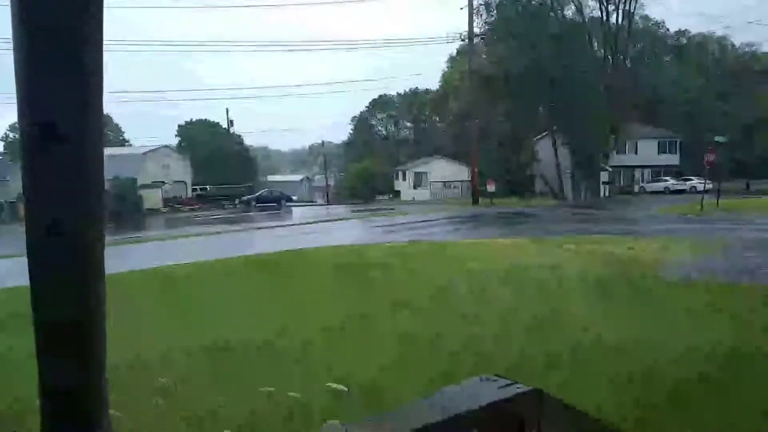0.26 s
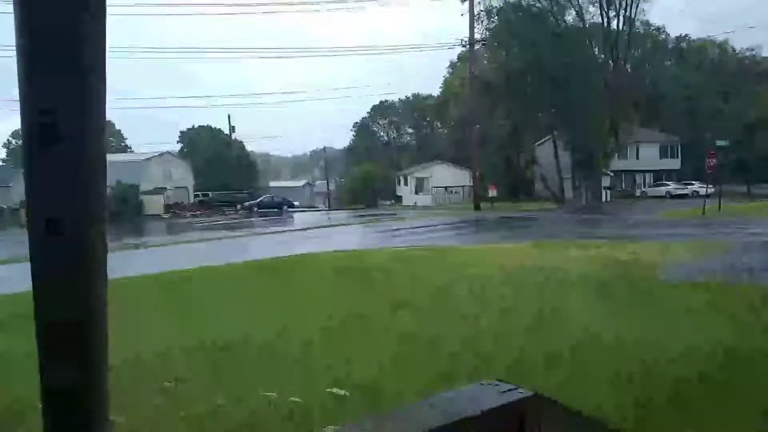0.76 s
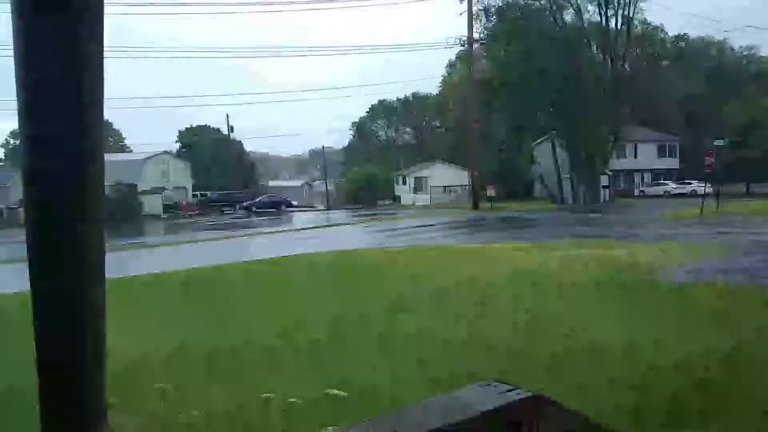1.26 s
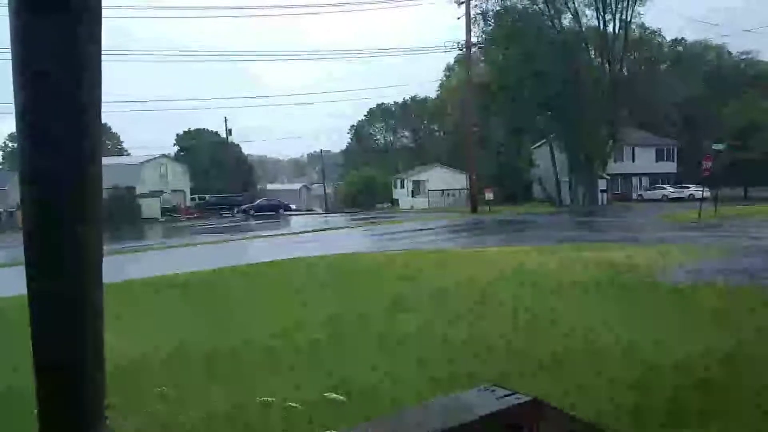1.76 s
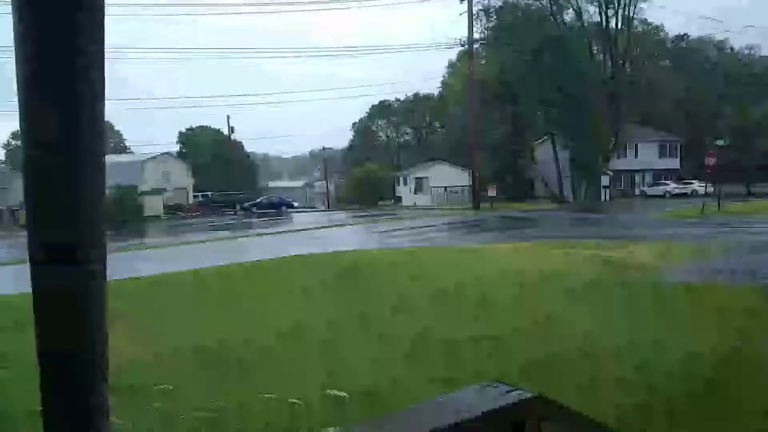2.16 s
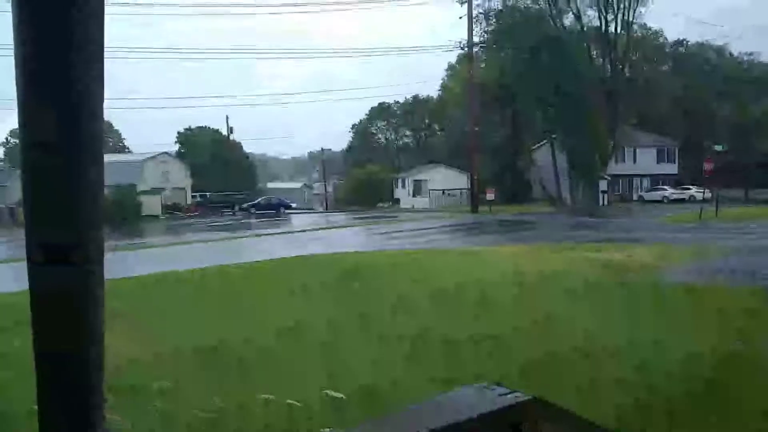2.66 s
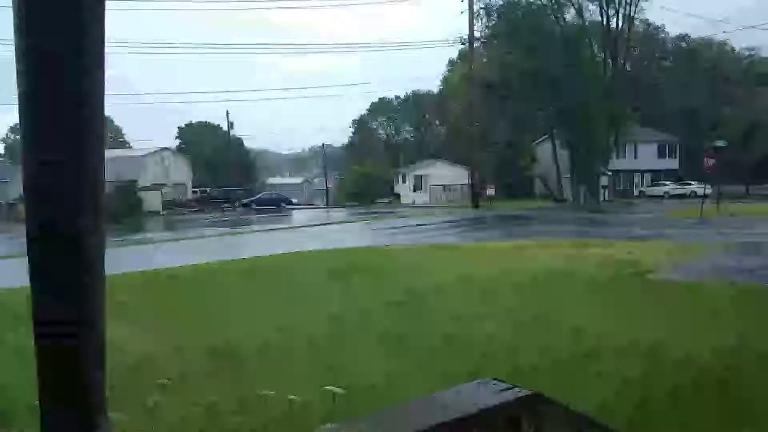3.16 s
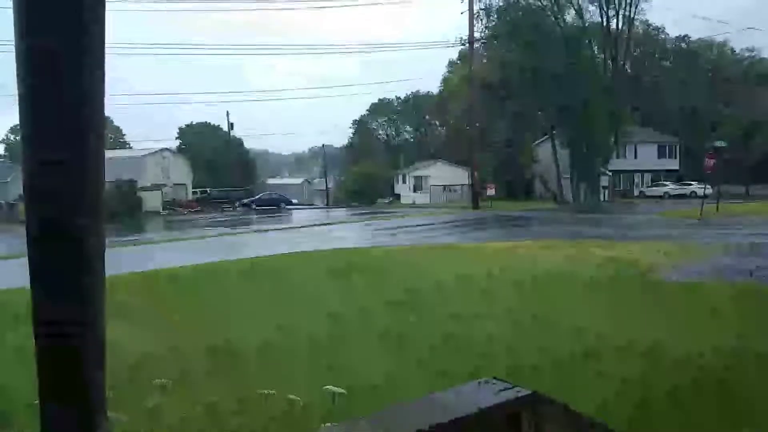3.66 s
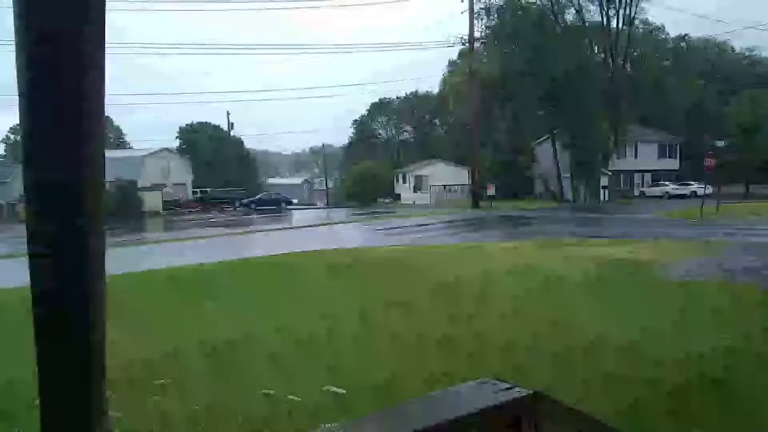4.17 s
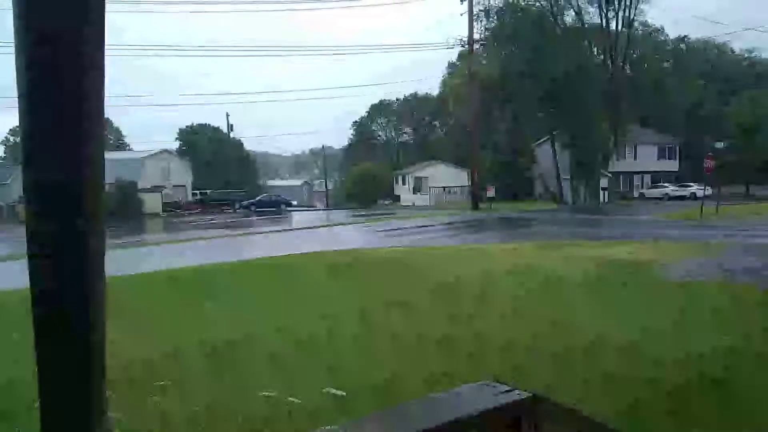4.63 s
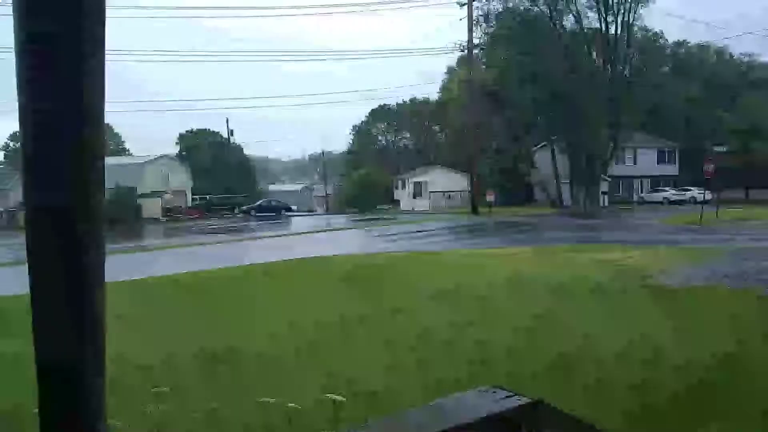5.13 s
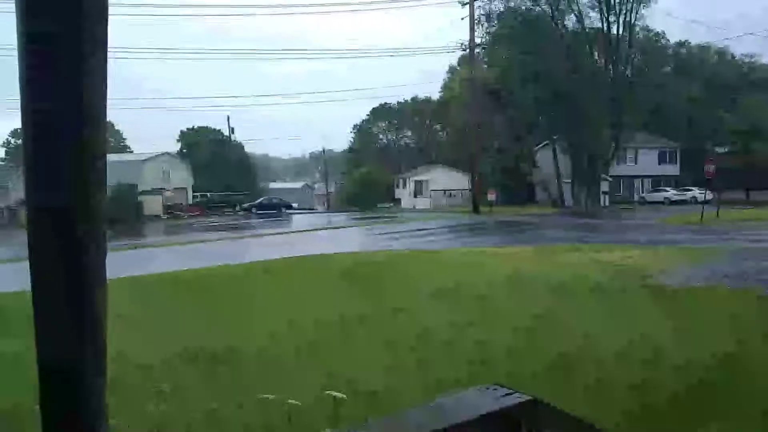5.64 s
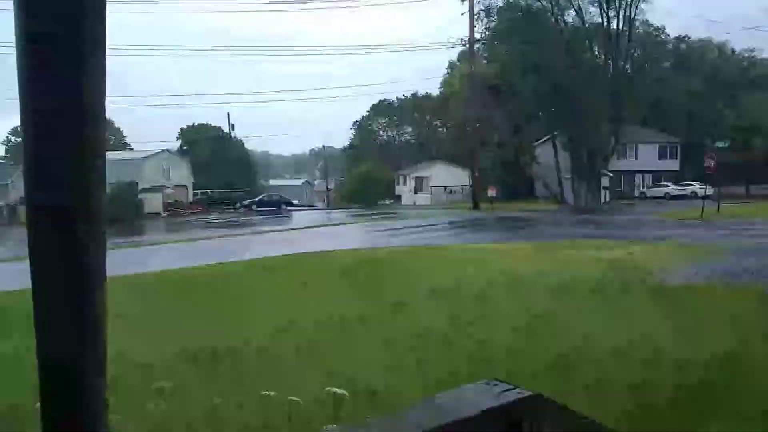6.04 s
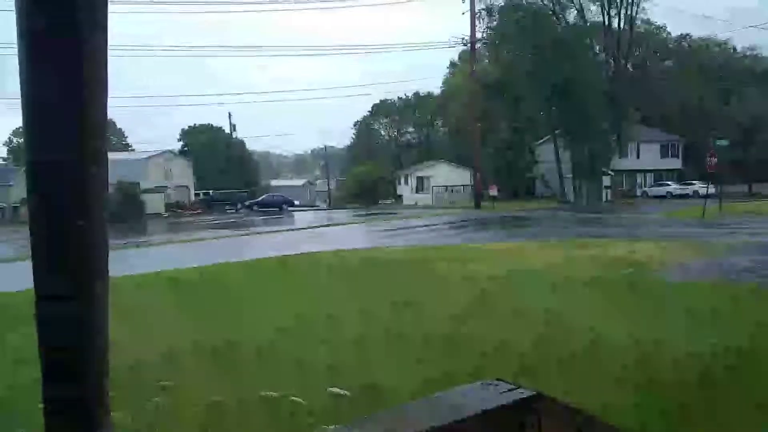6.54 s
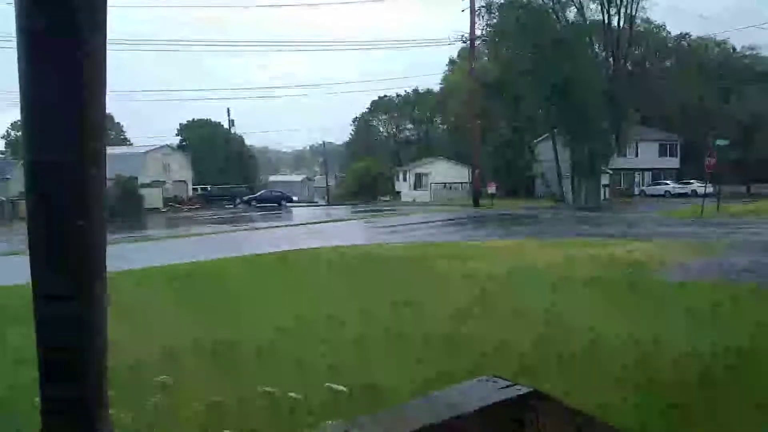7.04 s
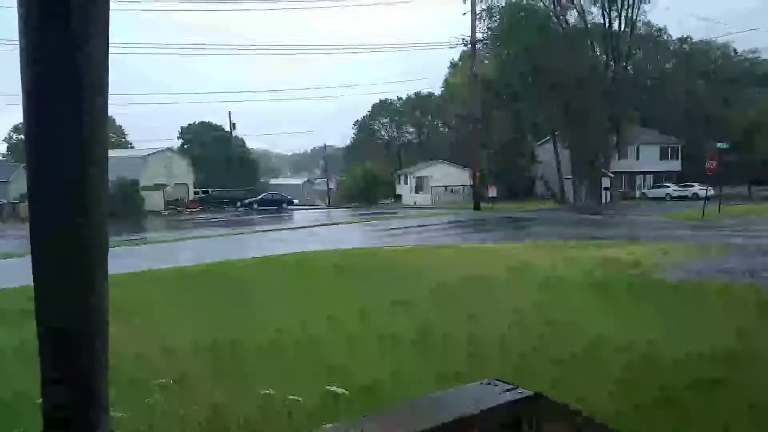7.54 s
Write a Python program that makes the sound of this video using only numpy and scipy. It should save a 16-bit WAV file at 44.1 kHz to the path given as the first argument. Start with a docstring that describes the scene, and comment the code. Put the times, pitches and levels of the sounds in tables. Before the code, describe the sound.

Wide continuous rain hiss with patchy, grainy treble and a low rumble beneath, outdoors near houses and trees. Small birds give faint low chirps first, then high thin whistles sliding down into quick twitters, returning several times. Isolated heavy drips burst softly near the porch, mostly in the first six seconds. A weak electrical hum wavers underneath; the top treble is dulled.

```python
"""Rain on a lawn, with birds

Steady heavy rain heard from a porch: noise and single ticks form a wide hiss over a low rumble.
Mains equipment hums as wavering sines; three birds sing in gliding sines with a scattered tail.
A few big drips splat nearby as short noise bursts in three bands.
Two microphone ports pick it up; each channel subtracts a delayed copy of the other port to widen the image."""
import sys
import numpy as np
from scipy import signal
from scipy.fft import rfft, irfft
from scipy.io import wavfile
from scipy.ndimage import uniform_filter1d

SR = 44100
rng = np.random.default_rng(int(sys.argv[2]) if len(sys.argv) > 2 else 0)


def waveform_to_disk(signal):
    """Save audio, clipped to [-1, 1], as 16-bit WAV at the path in sys.argv[1]."""
    frames = np.transpose(np.atleast_2d(signal))
    scaled = np.clip(frames, -1, 1) * 32767
    samples = np.round(scaled).astype(np.int16)
    wavfile.write(sys.argv[1], SR, samples)


N = 343980
HZ = np.maximum(np.fft.rfftfreq(N, 1 / SR), 1)  # FFT bins, kept above 0 for the log axis


def from_db(db):
    """Gain of a level in dB."""
    return 10 ** (np.asarray(db) / 20)


def by_hz(rows):
    """Each column of a table read at every FFT bin, on a log-frequency axis."""
    hz, *columns = np.transpose(rows)
    return [np.interp(np.log(HZ), np.log(hz), column) for column in columns]


def drift(points_per_s):
    """Slow chance of spread 1: random points joined by straight lines."""
    return np.interp(np.arange(N) * points_per_s / SR, np.arange(3000), rng.standard_normal(3000))


def band(x, low_hz, high_hz):
    """Causal band-pass."""
    return signal.sosfilt(signal.butter(2, [low_hz, high_hz], "band", fs=SR, output="sos"), x)


def at_ports(x, pan_db, lag_s):
    """A source off to one side reaches the right port lag_s later (earlier if negative), at another level."""
    right = irfft(rfft(x) * np.exp(-2j * np.pi * HZ * lag_s), N)
    return np.array([x * from_db(pan_db / 2), right * from_db(-pan_db / 2)])


# course of the shower: (time [s], rumble gain [dB], hiss gain [dB])
SHOWER_COURSE = [(0.0, -2, -0.5), (7.8, -2, -2.5)]
# rain spectrum before the shower gains: (frequency [Hz], density [dB per Hz])
RAIN_SPECTRUM = [(25, -74), (45, -76.5), (70, -70.5), (150, -74), (280, -75), (480, -81), (650, -86),
                 (2300, -88), (3000, -86), (3700, -89), (4500, -85.5), (5200, -86.5), (6500, -87),
                 (8000, -90.5), (10500, -100), (14000, -105)]
# the two ports: (frequency [Hz], likeness [-1 to 1], phase of right port [rad], left minus right [dB])
PORT_LIKENESS = [(28, .99, .07, -.4), (65, .96, -.03, -1.1), (100, .94, .03, -1.8), (150, .94, 0, -1.2),
                 (220, .88, -.22, -2.5), (370, .77, -.14, -.9), (480, .68, .05, -1.2),
                 (620, .34, .15, -1.2), (900, .1, 0, -1.8), (1500, -.18, 0, -1.5), (2400, -.1, 0, -.3),
                 (3000, -.2, 0, -3), (3600, 0, 0, -1), (4500, 0, 0, 1.2), (6500, 0, 0, 1.5),
                 (8000, 0, 0, -1), (10500, 0, 0, -3), (14000, 0, 0, -5.5)]
DROPS_PER_S, DROP_POWER_SHARE = 2500, 0.26


def rain(patchy_db, size_db):
    """Far drops merge to noise, nearer ones stay single ticks; gusts make the treble come in patches."""
    sizes = from_db(size_db * np.minimum(rng.exponential(1, (2, N)), 5))
    signed_sizes = sizes * rng.choice([-1, 1], (2, N))
    drops = signed_sizes * (rng.random((2, N)) < DROPS_PER_S / SR)
    far = rng.standard_normal((2, N))
    ticks = drops / drops.std()
    near = rfft(np.sqrt(1 - DROP_POWER_SHARE) * far + np.sqrt(DROP_POWER_SHARE) * ticks)

    time_s, rumble_db, hiss_db = np.transpose(SHOWER_COURSE)
    t, gust = np.arange(N) / SR, drift(14)
    white = irfft(rfft(far) * (HZ < 1000), N) * from_db(np.interp(t, time_s, rumble_db))
    for low_hz in 1000 * 2 ** np.arange(0, 4, .5):  # half-octave bands
        patch_db = np.interp(t, time_s, hiss_db) + patchy_db * (0.59 * gust + drift(20))
        in_band = (HZ >= low_hz) * (HZ < low_hz * np.sqrt(2))
        white += irfft(near * in_band, N) * from_db(patch_db)

    # long waves reach both ports nearly alike, short ones are mostly unrelated
    likeness, phase_rad, balance_db = by_hz(PORT_LIKENESS)
    density_db, = by_hz(RAIN_SPECTRUM)
    left, other = rfft(white) * from_db(density_db) * np.sqrt(SR / 2)
    right = likeness * left * np.exp(1j * phase_rad) + np.sqrt(1 - likeness ** 2) * other
    return irfft([left * from_db(balance_db / 2), right * from_db(-balance_db / 2)], N)


# hum lines before their drift: (frequency [Hz], level [dB])
HUM_LINES = [(120, -63), (179.5, -60), (240, -60), (480, -70), (720, -76)]
# extra gain of the third harmonic: (time [s], gain [dB])
THIRD_HARMONIC_SWELL = [(0, -8), (2.4, -20), (2.7, 1), (4.0, -5), (4.22, 14.5), (4.45, -1), (4.7, 6.5),
                        (6.8, 4.5), (7.8, -8)]


def hum():
    """Mains harmonics: sines whose levels waver; the third one also swells."""
    t = np.arange(N) / SR
    lines = []
    for hz, level_db in HUM_LINES:
        waver = from_db(level_db + 3.0 * drift(8))
        lines.append(waver * np.sin(2 * np.pi * (hz * t + rng.random())))
    lines[1] *= from_db(np.interp(t, *np.transpose(THIRD_HARMONIC_SWELL)))
    return sum(lines)


def bird(notes, flutter_db, rasp_hz):
    """Each note is a gliding sine with soft ends; held notes are purer, fast glides turn raspy."""
    out, tremble_hz = np.zeros(N), rasp_hz * drift(330)
    for note in notes:
        time_s, hz, level_db = np.transpose(note)
        at = np.arange(round(time_s[0] * SR), round(time_s[-1] * SR))
        t = at / SR
        ends = np.clip(np.minimum(t - time_s[0], time_s[-1] - t) / .004, 0, 1)
        pitch_hz = np.interp(t, time_s, hz)
        glide = np.clip(abs(np.gradient(pitch_hz)) * SR / 15000, .25, 1)  # 1 = 15 kHz/s or faster
        phase = 2 * np.pi * np.cumsum(pitch_hz + glide * tremble_hz[at]) / SR
        flutter = from_db(flutter_db * (.5 + glide) * drift(140)[at])
        level = np.sqrt(2) * from_db(np.interp(t, time_s, level_db))
        out[at] += ends * flutter * level * np.sin(phase)
    return out


EDGE_DB = 1  # drop at both ends of a chirp
THIN_HZ, THIN_DB_PER_KHZ = 6350, 14  # chirps weaken above this pitch


def chirps(rows):
    """The pitch of a chirp is a parabola through its start, middle and end."""
    u, notes = np.linspace(-1, 1, 9), []
    for start_s, length_s, start_hz, middle_hz, end_hz, level_db in rows:
        slope_hz = (end_hz - start_hz) / 2
        bend_hz = (start_hz + end_hz) / 2 - middle_hz
        hz = middle_hz + slope_hz * u + bend_hz * u ** 2
        thin_db = THIN_DB_PER_KHZ * np.maximum(hz - THIN_HZ, 0) / 1000
        time_s = start_s + length_s * (u + 1) / 2
        notes.append(np.transpose([time_s, hz, level_db - EDGE_DB * u ** 2 - thin_db]))
    return notes


# (time [s], length [s], start pitch [Hz], middle pitch [Hz], end pitch [Hz], level before flutter [dB])
DEEP_BIRD_CHIRPS = [(.295, .014, 2750, 2820, 2900, -57), (.372, .011, 2930, 2810, 2700, -55),
                    (.565, .05, 2550, 2510, 2480, -60), (.612, .016, 3200, 3150, 3100, -57),
                    (.718, .014, 2600, 2620, 2640, -57), (2.207, .051, 2900, 2855, 2820, -49),
                    (5.33, .02, 3000, 2900, 2800, -55)]


def deep_bird():
    """Curved chirps of the deepest bird, with the least flutter and rasp."""
    return bird(chirps(DEEP_BIRD_CHIRPS), flutter_db=1.5, rasp_hz=50)


# (time [s], length [s], start pitch [Hz], middle pitch [Hz], end pitch [Hz], level before flutter [dB])
LOW_BIRD_CHIRPS = [(.335, .055, 3300, 3350, 3050, -59), (.525, .025, 3400, 3300, 3200, -58),
                   (1.855, .025, 3660, 3850, 4200, -62), (2.205, .03, 3460, 3550, 3650, -61),
                   (2.89, .025, 4000, 3950, 3900, -60), (4.186, .03, 3690, 3660, 3720, -57),
                   (4.329, .018, 3450, 3950, 5100, -56), (4.36, .016, 3850, 3820, 3600, -46),
                   (4.373, .021, 3550, 3480, 3900, -49), (4.398, .011, 3600, 3400, 3500, -49.5),
                   (4.407, .015, 3750, 3780, 3950, -53)]


def low_bird():
    """Curved chirps of the low bird, mostly pitched between the other two."""
    return bird(chirps(LOW_BIRD_CHIRPS), flutter_db=2.2, rasp_hz=60)


def echoes(x, wet_db, t60_s):
    """Trees and house walls scatter the song into a short tail, another one at each port."""
    t = np.arange(SR // 2) / SR
    tails = rng.standard_normal((2, len(t))) * from_db(-60 * t / t60_s) * (t > .006)
    tails /= np.sqrt(np.sum(tails ** 2, axis=1, keepdims=True))
    return from_db(wet_db) * signal.fftconvolve(x[None], tails, axes=1)[:, :N]


# big drips: (time [s], level before lift [dB], 1-2.6 kHz part before lift [dB],
# 6.5-10.5 kHz part before lift [dB], t60 [s], left minus right [dB])
DRIPS = [(0.667, -44, -11, -20, 0.067, 3), (2.146, -35.5, -19, -22, 0.16, 4),
         (2.61, -43, -5, -16, 0.056, 2), (3.022, -59, -10, -16, 0.1, -3), (3.439, -59, -9, 5, 0.1, 1),
         (3.4854, -44, -6, -11, 0.13, 1), (4.888, -49, 2.5, -17, 0.21, -11),
         (5.3383, -46, -16, -24, 0.22, 2), (5.6173, -43.5, -18, -18, 0.16, -1),
         (5.722, -46, -6, -11, 0.092, 2), (6.059, -55.5, 0, 2, 0.1, -4)]
DRIP_LIFT_DB, LOW_LIFT_DB, HIGH_LIFT_DB = 6.0, 2.0, 2.5


def splats():
    """A big drip bursts into spray: a noise burst in three bands that dies fast."""
    out, t = np.zeros((2, N)), np.arange(SR // 5) / SR
    for start_s, level_db, low_db, high_db, t60_s, pan_db in DRIPS:
        envelope = (1 - np.exp(-t / 0.00065)) * from_db(-60 * t / max(t60_s, .02))
        spray = rng.standard_normal((2, len(t))) * envelope
        # a narrow band holds less of the noise, so the parts are lifted
        burst = band(spray, 1840, 4840)
        burst += from_db(low_db + LOW_LIFT_DB) * band(spray, 920, 2630)
        burst += from_db(high_db + HIGH_LIFT_DB) * band(spray, 6500, 10500)
        at = round(start_s * SR)
        sides_db = pan_db * np.array([[.5], [-.5]])
        out[:, at:at + len(t)] += from_db(level_db + DRIP_LIFT_DB + sides_db) * burst
    return out


# held whistles: (time [s], length [s], pitch [Hz], scoop from below [Hz], end level before flutter [dB])
HELD_WHISTLES = [(1.692, .041, 6550, 0, -52), (3.99, .036, 6660, 0, -48), (5.064, .084, 6720, 150, -50),
                 (7.258, .085, 6700, 1000, -51)]
SCOOP_S, SWELL_DB = .014, 6
SECOND_VOICE_HZ, SECOND_VOICE_DB = 900, -11  # relative to the whistle


def whistles():
    """A whistle scoops up to its pitch and swells; a weaker second voice holds above it."""
    notes = []
    for start_s, length_s, hz, scoop_hz, level_db in HELD_WHISTLES:
        end_s, scooped_s = start_s + length_s, start_s + SCOOP_S
        notes.append([(start_s, hz - scoop_hz, level_db - SWELL_DB),
                      (scooped_s, hz, level_db - SWELL_DB / 2),
                      (end_s, hz, level_db)])
        second_hz, second_db = hz + SECOND_VOICE_HZ, level_db + SECOND_VOICE_DB
        notes.append([(start_s + SCOOP_S / 2, second_hz, second_db), (end_s, second_hz, second_db)])
    return notes


# slides: (time [s], length [s], landing pitch [Hz], level before fade and flutter [dB])
DOWN_SLIDES = [(1.729, .06, 5340, -54), (4.022, .046, 5420, -46.5), (4.073, .044, 5440, -49),
               (5.111, .012, 6160, -48), (7.338, .022, 6100, -50)]
TOP_HZ, SLIDE_S, FADE_DB_PER_S = 6650, .008, 150


def slides():
    """A slide drops fast from the top pitch, then holds and fades."""
    notes = []
    for start_s, length_s, hz, level_db in DOWN_SLIDES:
        end_db = level_db - FADE_DB_PER_S * length_s
        notes.append([(start_s, TOP_HZ, level_db),
                      (start_s + SLIDE_S, hz, level_db),
                      (start_s + length_s, hz, end_db)])
    return notes


# (time [s], length [s], start pitch [Hz], middle pitch [Hz], end pitch [Hz], level before flutter [dB])
HIGH_BIRD_CHIRPS = [(1.745, .014, 6050, 6050, 6100, -51), (1.875, .016, 6100, 6200, 6350, -54),
                    (1.925, .022, 5900, 6150, 6350, -55), (1.958, .024, 5500, 5000, 4840, -54),
                    (4.03, .02, 5800, 6250, 6350, -56), (4.046, .03, 5600, 6300, 6600, -49),
                    (4.094, .03, 5480, 6300, 6550, -50), (4.122, .026, 6100, 5200, 4950, -49),
                    (4.155, .03, 4950, 5150, 5750, -54), (4.135, .03, 6500, 5900, 5500, -57),
                    (4.16, .045, 6400, 5900, 5000, -55), (5.056, .01, 6050, 6250, 6500, -52),
                    (5.252, .04, 5650, 6650, 6100, -47.5), (5.285, .06, 5950, 5600, 6000, -55),
                    (5.285, .045, 5300, 5100, 4800, -57), (5.316, .022, 6000, 6600, 6050, -46.5),
                    (7.343, .022, 5600, 5300, 5250, -54), (7.36, .04, 5950, 6550, 6450, -48),
                    (7.375, .024, 6050, 6050, 6000, -56), (7.395, .045, 5400, 5250, 4900, -56),
                    (7.418, .05, 6050, 6600, 6650, -52), (7.45, .045, 6300, 5600, 5400, -59),
                    (7.588, .016, 4900, 5500, 6340, -60), (7.47, .08, 6620, 6600, 6550, -57),
                    (7.572, .04, 5100, 4850, 5000, -59), (1.81, .014, 5300, 5300, 5300, -56),
                    (1.9, .04, 5300, 5100, 5300, -61), (1.728, .012, 6200, 6100, 6000, -53),
                    (1.894, .012, 6100, 6100, 6150, -55), (5.117, .012, 5300, 5300, 5250, -56),
                    (5.154, .03, 5500, 5000, 5100, -59), (7.47, .03, 5400, 5450, 5400, -56)]
HOARSE_DB = -5  # against the purer voice


def high_bird():
    """Whistles, slides and chirps; a hoarse, raspier voice doubles the slides and chirps."""
    song = slides() + chirps(HIGH_BIRD_CHIRPS)
    pure = bird(whistles() + song, flutter_db=2.6, rasp_hz=110)
    hoarse = bird(song, flutter_db=3.0, rasp_hz=600)
    return pure + from_db(HOARSE_DB) * hoarse


def scene():
    """All sources at the two ports."""
    shower = rain(patchy_db=1.27, size_db=3.5)
    mains = at_ports(hum(), pan_db=-2, lag_s=.00003)
    deep, low = deep_bird(), low_bird()
    drips = splats()
    high = high_bird()
    birds = at_ports(deep, pan_db=-3.0, lag_s=-.00015)
    birds += at_ports(low, pan_db=-3.0, lag_s=-.000235)
    birds += at_ports(high, pan_db=2, lag_s=.000165)
    birds += echoes(low + deep, wet_db=-7.0, t60_s=0.16)
    birds += echoes(high, wet_db=-1.5, t60_s=0.35)
    return shower + mains + birds + drips


# widening: (frequency [Hz], share of opposite port subtracted from left [0-1], from right [0-1],
# phase lead of the copy [rad])
WIDENING = [(1500, 1, 1, 0), (2250, 1, 1, -.05), (2600, 1, 1, 0), (3500, .68, .76, .16),
            (4500, .3, .72, .09), (5500, .12, .7, 0), (7000, .03, .47, 0), (8200, 0, .27, 0),
            (9500, 0, .12, 0), (11000, 0, 0, 0)]
CROSS_LAG_S = .000442


def widen(ports):
    """Each channel's spectrum loses a delayed, treble-dulled copy of the opposite port."""
    *shares, lead_rad = by_hz(WIDENING)
    delay = np.exp(1j * lead_rad - 2j * np.pi * HZ * CROSS_LAG_S)
    return ports - shares * delay * ports[::-1]


# notch in what both channels share: (frequency [Hz], gain [dB])
CENTRE_NOTCH = [(2040, 0), (2120, -22), (2250, -36), (2340, -22), (2420, 0)]
# bands of the centre that drop out at times: (low edge [Hz], high edge [Hz], share of the time [0-1])
WAVERING_BANDS = [(2020, 2140, .45), (2320, 2430, .8), (2430, 2570, .4), (4390, 4560, .12)]
WAVERS_PER_S = 14
# moments when the hollow fills: (time [s], length [s], share filled [0-1])
HOLLOW_FILLS = [(.705, .05, .15), (4.875, .055, .8)]


def hollow_centre(wide):
    """The image centre is notched in one band; nearby bands and one an octave up drop out by chance."""
    t = np.arange(N) / SR
    middle = wide.mean(axis=0)
    notch_db, = by_hz(CENTRE_NOTCH)
    centre = from_db(notch_db) * middle
    filled = sum(share * (t > start_s) * (t < start_s + length_s) for start_s, length_s, share in HOLLOW_FILLS)
    hollow = 1 - uniform_filter1d(filled, size=400)
    out = irfft(wide, N) - hollow * irfft(middle - centre, N)
    for low_hz, high_hz, share in WAVERING_BANDS:
        chance = drift(WAVERS_PER_S)
        gone = uniform_filter1d(1. * (chance < np.quantile(chance, share)), size=400)
        out = out - hollow * gone * irfft(centre * (HZ > low_hz) * (HZ < high_hz), N)
    return out


def record(dry):
    """The ports are widened, the centre is hollowed, and a steep low-pass cuts the top."""
    hollowed = hollow_centre(widen(rfft(dry)))
    return signal.sosfilt(signal.ellip(18, .3, 75, 14200, fs=SR, output="sos"), hollowed)


dry = scene()
out = record(dry)
waveform_to_disk(out)
```